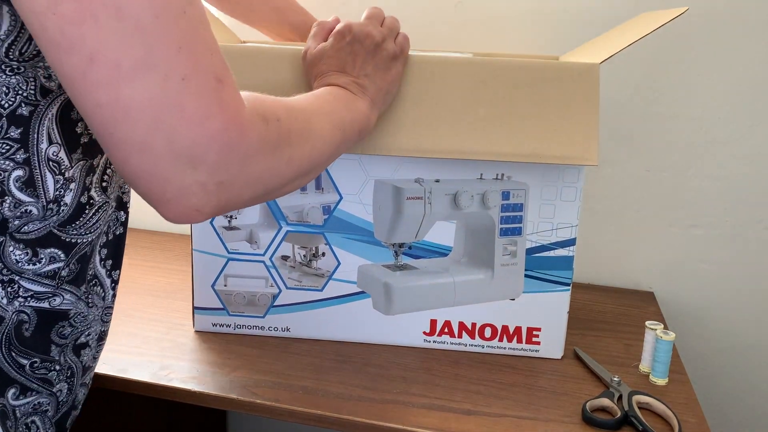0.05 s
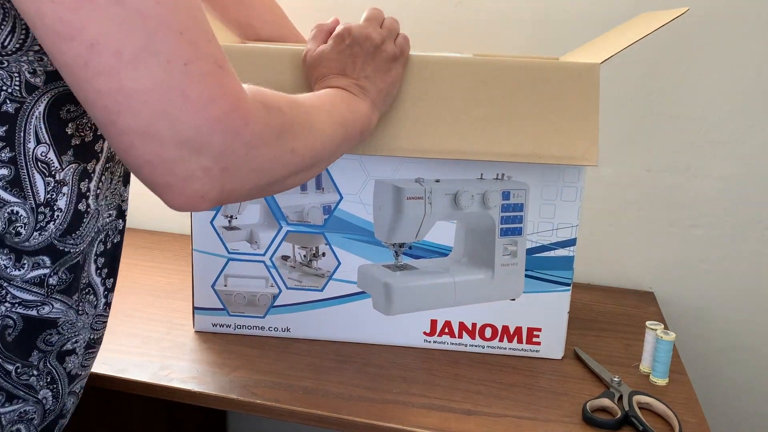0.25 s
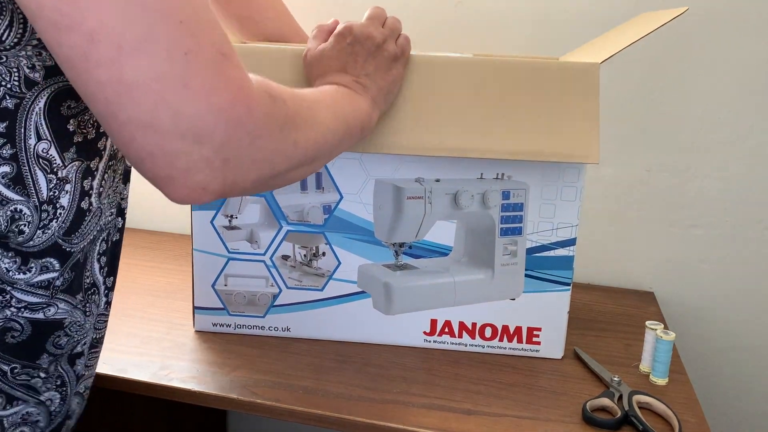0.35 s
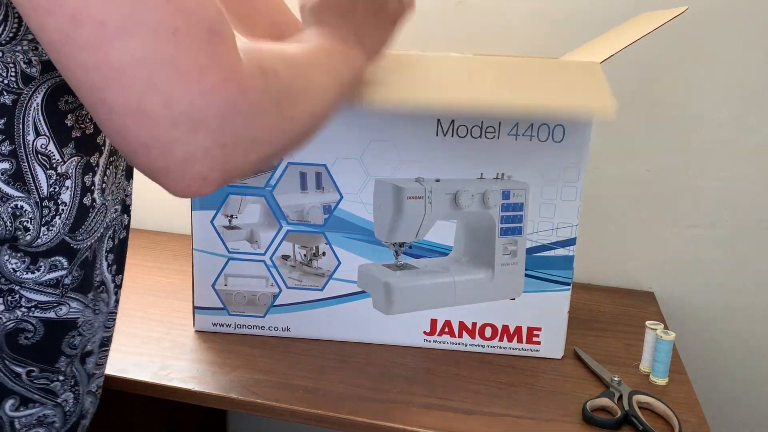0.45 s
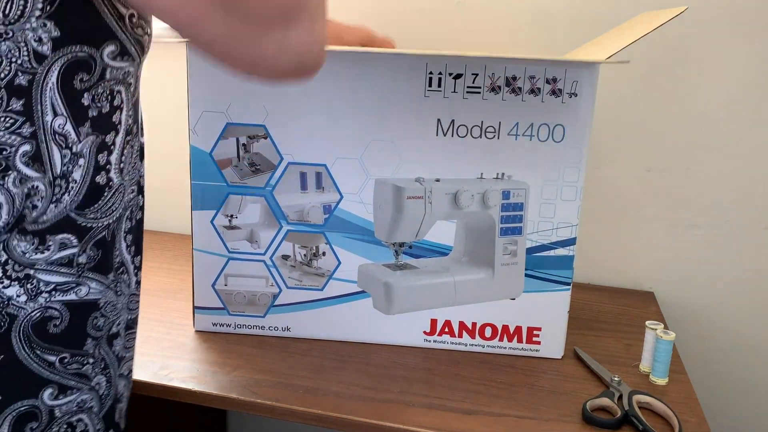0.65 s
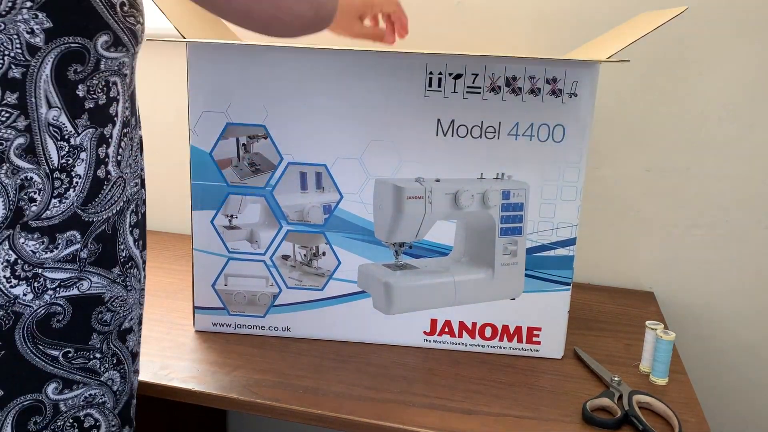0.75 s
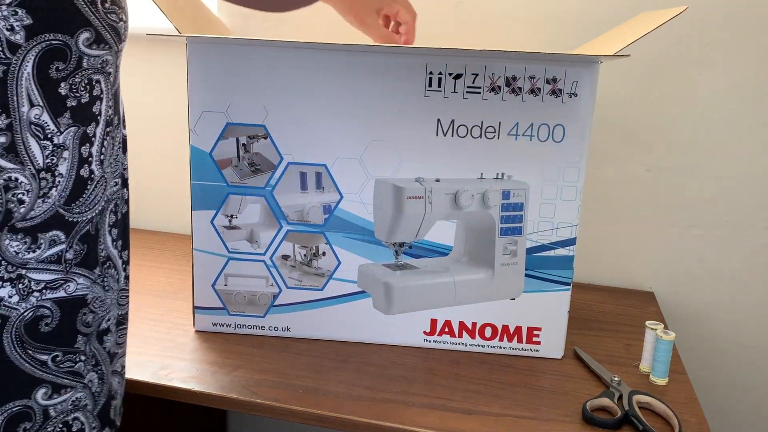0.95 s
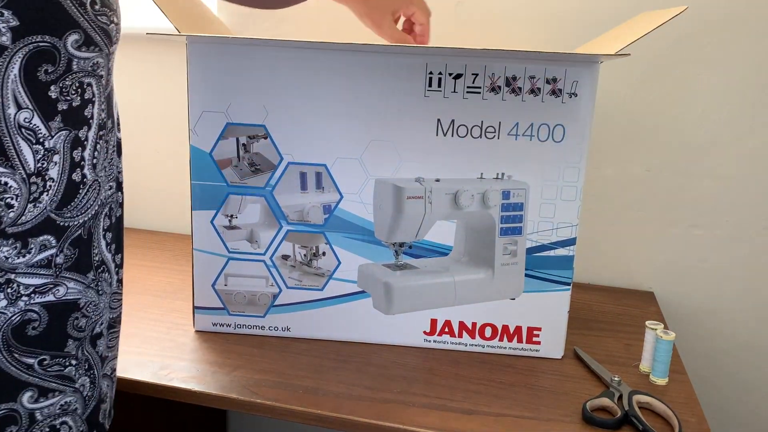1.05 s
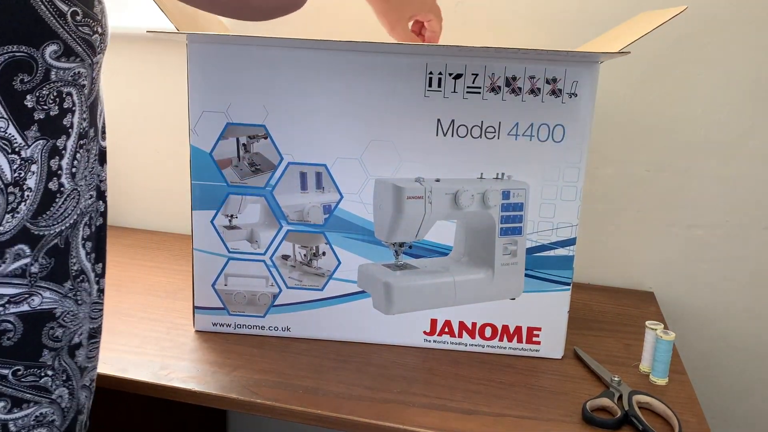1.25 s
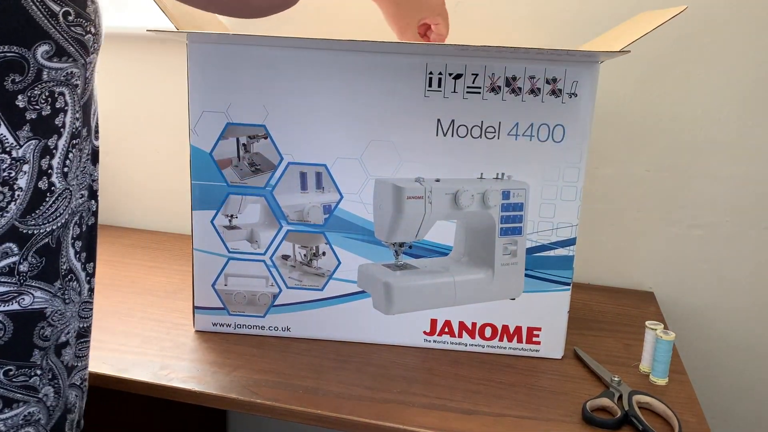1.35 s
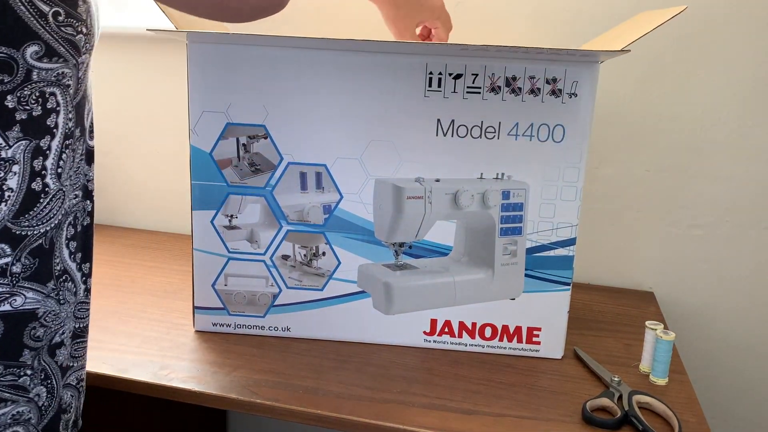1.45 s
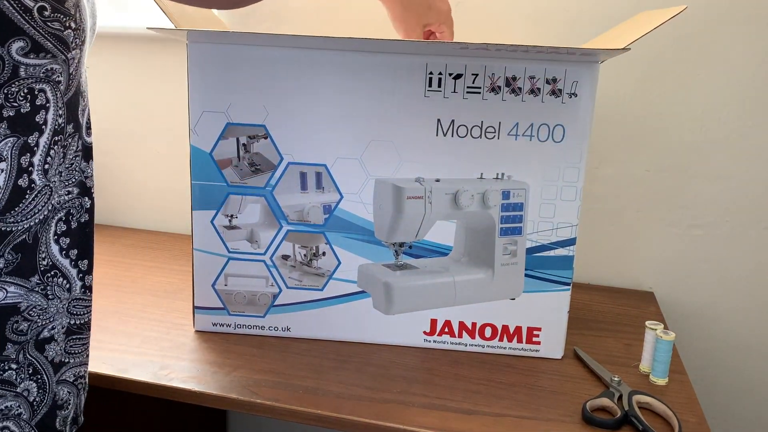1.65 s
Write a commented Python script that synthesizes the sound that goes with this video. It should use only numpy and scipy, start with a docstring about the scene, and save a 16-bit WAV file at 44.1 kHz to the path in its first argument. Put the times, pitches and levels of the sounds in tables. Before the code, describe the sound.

Cardboard box flaps are opened by hand: a light bump and drumming scrape, one sharp hollow knock, rough rubbing, a low flap wobble, then scattered ticks and faint rustles, close stereo phone microphones in a quiet room.

```python
"""A light bump and a short drumming scrape open the scene: hands pull at the flaps of a cardboard box
in a quiet room, close to a phone with two microphone ports. One sharp knock and lighter bumps ring
the modes of the hollow box; ticks are snaps of noise. Grainy noise makes card scrape over card and
drum the box. A freed flap wobbles low and a panel groans downward, both as gliding sines.
A faint squeak is resonant noise; room tone and a decaying noise echo lie behind it all."""
import sys
import numpy as np
from scipy import signal
from scipy.fft import rfft, irfft
from scipy.io import wavfile
from scipy.ndimage import uniform_filter1d

SR = 44100
rng = np.random.default_rng(int(sys.argv[2]) if len(sys.argv) > 2 else 0)


def materialize(psi):
    """Save the field psi as 16-bit PCM at rate SR to the path in sys.argv[1].

    A 1-D psi becomes a single channel; in a 2-D psi each row is a channel.
    """
    bounded = np.clip(np.atleast_2d(psi).T, -1, 1)
    quanta = np.round(bounded * 32767).astype(np.int16)
    wavfile.write(sys.argv[1], SR, quanta)


N = 74970
T = np.arange(N) / SR
F = np.arange(N // 2 + 1) * SR / N

# spectrum of the room tone: f/Hz, density level/dB
ROOM_SPECTRUM = [(40, -21), (400, -7), (900, -25), (1800, -12.5), (4000, -39.5), (9000, -22.5),
                 (16000, -23)]
ROOM_DB = -75.5
ROOM_T60_S, ECHO_GAP_S = 0.28, .003
WET_DB, SIDE_ECHO_DB = -28.5, -6

# phase of the left port against the right: f/Hz, phase/rad
PORT_PHASE = [(0, 0), (400, -.15), (2000, -1.6), (4000, -3.1), (6300, -6.3), (16500, -19.85)]
# sound unrelated between the ports, as side level: f/Hz, level/dB
PORT_SIDE = [(60, -15), (250, -21), (700, -6), (2000, -1), (5000, -4), (8000, -18), (16000, -16)]
RIGHT_DB = .7  # right port over left
LOW_CUT_HZ, TOP_HZ = 40, 15900

# squeak of a sliding edge: t/s, level/dB
SQUEAK_LEVEL = [(.62, -82), (.69, -71), (.78, -72), (.86, -80), (.9, -95)]
# resonances of the squeak: f/Hz, level/dB
SQUEAK_RESONANCES = [(1700, 0), (2350, -1), (3400, -2)]
SQUEAK_WIDTH_HZ = 170  # full width at half amplitude

# free flap wobbling: t/s, f/Hz, level/dB
FLAP_WOBBLE = [(.7, 62, -69), (.718, 73, -48), (.745, 62.4, -53.5), (.775, 65.6, -56), (.81, 69.8, -56.5),
               (.85, 72, -64.5), (.9, 68.7, -80.5)]
# panel groaning: t/s, f/Hz, level of the fundamental/dB
PANEL_GROAN = [(.934, 168.8, -63), (.942, 164, -43), (.955, 125.3, -42), (.97, 109.5, -41), (.986, 92, -41),
               (1.002, 71.5, -63)]
# groan harmonics from the second up, against the fundamental: level/dB
GROAN_HARMONICS = [-20.5, -13]

# ticks of card edges: t/s, level/dB, centre f/Hz, tail t60/s
EDGE_TICKS = [(0.1991, -27, 8050, 0.2), (0.3553, -27.5, 3700, 0.13), (0.4874, -30, 10100, 0.032),
              (0.5095, -31, 6740, 0.48), (0.9477, -31, 5500, 0.16), (1.038, -31.5, 4430, 0.31),
              (1.068, -23, 8500, 0.19), (1.1786, -27, 3640, 0.13), (1.232, -37, 3920, 0.05),
              (1.268, -30, 6800, 0.13), (1.3203, -31.5, 4600, 0.058), (1.341, -37.5, 5470, 0.27),
              (1.3815, -30, 6400, 0.23), (1.402, -38, 3980, 0.44), (1.483, -31.5, 4400, 0.14),
              (1.27, -35.5, 2130, 0.045), (1.341, -35.5, 2100, .06), (1.499, -37, 6200, 0.087),
              (1.6079, -23, 7440, 0.031), (1.686, -30.5, 5860, 0.07), (1.025, -35.5, 4700, 0.12),
              (1.251, -39, 6500, 0.04), (1.275, -34, 4800, 0.034), (1.351, -35, 5760, 0.091)]
TICK_SNAP_S, TICK_TAIL_DB = .011, -14  # t60 of the snap, level of the tail against it
TICK_WIDTH = 1.0  # bandwidth as a ratio to the centre
TICK_LEN = 8192  # samples

# modes of the hollow box: f/Hz, level/dB, t60/s
BOX_MODES = [(92.8, -20.5, 0.093), (162.8, 7, 0.069), (217, 0, 0.088), (324.8, 5, 0.067), (454, -9, 0.076),
             (571, -11, 0.12), (653.4, -7, 0.076), (760.4, -15.5, 0.2), (847, -13, 0.082), (892, -17, 0.12),
             (1002, -26, 0.04), (1253, -2.5, 0.013), (1470, -21.5, 0.1)]
PANELS_BELOW_HZ = 270  # modes under this belong to the big panels
# blows on the box: t/s, level/dB, push length/ms, big panels' share level/dB, pitch where held/ratio
BOX_BLOWS = [(.006, -39.5, 1.01, -25, 1.38), (0.172, -37, 1.16, 0, 0.85), (0.1986, -7, 1.234, -2.5, 1.01),
             (0.2044, -19, 1.58, -1, 1), (0.2174, -18, 4, 2.5, 1.2), (0.365, -28.5, 1.4, 6, 1.13),
             (0.411, -36, 0.91, -25, 1.11), (0.444, -34, 0.66, -8, 1.05), (0.511, -42, 1.4, -10, 1.04),
             (0.936, -42, 2.3, -10.5, 1.1), (1.1794, -39, 0.54, -7.5, 1.01),
             (1.232, -42.5, 0.63, -16, 1.075), (1.276, -43.5, 1.1, -7, 0.86),
             (1.3217, -39.5, 0.81, -3, 1.01), (1.639, -39, 1.54, -16, 0.96), (1.667, -40, 0.54, -5.5, 0.95)]
# spectrum of the crack in a blow: f/Hz, level/dB
CRACK_SPECTRUM = [(600, 4.5), (1400, -1), (2200, -9.5), (4000, -11.5)]
CRACK_DB, CRACK_T60_S = -20, .05  # level for a 1 ms push

# rubbing: t/s, hiss level/dB, middle level/dB, drumming box level/dB, rumble level/dB
RUB_LEVELS = [(0, -61.5, -60.5, -44, -54), (.04, -83, -61.5, -51.5, -51), (.1, -110, -77, -59.5, -54),
              (.165, -73, -81, -70, -52), (.19, -71, -56.5, -79, -42.5), (.21, -41.5, -68, -33.5, -32.5),
              (.24, -65, -59, -43.5, -32), (.285, -63, -71, -41, -38), (.325, -48.5, -49.5, -50, -47),
              (.38, -49, -48, -43.5, -50), (.425, -43.5, -50.5, -53, -49), (.465, -57.5, -47.5, -48, -92),
              (.485, -64, -60.5, -61.5, -57), (.52, -58, -59, -55.5, -56), (.575, -50, -53.5, -46, -74),
              (.64, -63, -66.5, -58.5, -69), (.69, -60, -62, -54, -59.5), (.72, -97, -69.5, -60, -59.5),
              (.8, -75.5, -78.5, -66, -65), (.83, -85.5, -82.5, -87, -82), (.92, -81.5, -81, -87, -91),
              (.945, -49, -59, -53, -45), (.99, -52.5, -72.5, -63.5, -53.5),
              (1.04, -52.5, -63.5, -62, -60.5), (1.085, -60, -67, -63.5, -59), (1.15, -74, -62, -67.5, -63),
              (1.2, -49.5, -66, -56.5, -74), (1.225, -74, -61, -68, -61), (1.26, -50.5, -61.5, -64, -70),
              (1.285, -71, -60.5, -52, -68), (1.312, -62, -59.5, -67, -56), (1.345, -48.5, -61, -56.5, -60),
              (1.375, -61.5, -66, -63.5, -82), (1.41, -65, -61.5, -59, -83), (1.46, -59, -67.5, -59, -66),
              (1.5, -72, -56, -62, -57), (1.56, -109, -68, -71, -68.5), (1.6, -72, -67, -68, -67.5),
              (1.62, -55.5, -62.5, -63, -63.5), (1.66, -50, -57, -53.5, -93), (1.7, -49, -50, -56, -65)]
# spectra of the hiss, middle range and rumble: f/Hz, level/dB
HISS_SPECTRUM = [(2500, -9), (3500, -4), (5000, -3), (6800, 0), (9000, 7), (11500, 9), (14000, 7),
                 (16000, 5.5)]
MIDDLE_SPECTRUM = [(500, 4.5), (800, 1.5), (1100, 1.5), (1500, 2.5), (2200, 2), (3000, -1.5), (4200, -3)]
RUMBLE_SPECTRUM = [(30, -6.5), (50, -5.5), (140, 2), (220, -6.5)]
# how well rubbing excites the box: f/Hz, level/dB
DRUM_SPECTRUM = [(120, -6.5), (220, 2), (330, 5), (456, 11.5), (600, -9), (1500, 3.5)]
DRUM_WIDEN, DRUM_TILT = 1.2, .5  # factors on the modes' decay rate and dB levels
GRAINS_PER_S, GRAIN_SHARE = 450, 0.23  # rate, share of power
GRAIN_SCATTER_DB, GRAIN_CAP_DB = 4, 14  # mean before the cap, cap
FLICKER_DB, FLICKERS_PER_S = 1.5, 45.55
PATCHY_DB, PATCHES_PER_S = 2.4, 30


def undb(db):
    """Turn dB into gain."""
    return 10 ** (np.asarray(db, float) / 20)


def unit(x):
    """Bring a signal to rms 1."""
    return x / np.sqrt(np.mean(x ** 2))


def noise():
    """White noise for the whole scene."""
    return rng.standard_normal(N)


def over_hz(table):
    """Read a spectrum table at every frequency, on a log axis."""
    hz, value = np.array(table, float).T
    return np.interp(np.log(F + 1), np.log(hz), value)


def colour(x, table):
    """Shape a signal by a spectrum table, falling away outside it."""
    low_edge = np.minimum(1, (F / table[0][0]) ** 2)
    high_edge = np.minimum(1, (table[-1][0] / (F + 1)) ** 2)
    return irfft(rfft(x) * undb(over_hz(table)) * low_edge * high_edge, N)


def curve(table, col):
    """Draw one column of a time table as a sample-by-sample curve."""
    points = np.array(table, float)
    return np.interp(T, points[:, 0], points[:, col])


def walk(rate):
    """Random levels held for 1 / rate s, then slewed; rms 1."""
    hold = int(SR / rate)
    steps = np.repeat(rng.standard_normal(N // hold + 1), hold)
    return unit(uniform_filter1d(uniform_filter1d(steps, hold), hold)[:N])


def room_tone():
    """Steady coloured noise of the quiet room."""
    return undb(ROOM_DB) * unit(colour(noise(), ROOM_SPECTRUM))


def echo(x):
    """Room tail: exponentially fading noise after a short gap, drawn afresh each time."""
    t = T[:SR // 2]
    tail = rng.standard_normal(len(t)) * 1000. ** (-t / ROOM_T60_S) * (t > ECHO_GAP_S)
    return signal.fftconvolve(x, tail / np.linalg.norm(tail))[:N]


def squeak():
    """A sliding edge squeaks faintly: noise through narrow resonances."""
    shape = sum(undb(db) / (1 + ((F - hz) * 2 / SQUEAK_WIDTH_HZ) ** 2)
                for hz, db in SQUEAK_RESONANCES)
    return unit(irfft(rfft(noise()) * shape, N)) * undb(curve(SQUEAK_LEVEL, 1))


def rumble():
    """Low noise that follows the rubbing."""
    return unit(colour(noise(), RUMBLE_SPECTRUM)) * undb(curve(RUB_LEVELS, 4))


def panel_swing(table, harmonics_db=()):
    """A swinging panel sounds a low sine, with any harmonics, gliding in pitch and level."""
    phase = 2 * np.pi * np.cumsum(curve(table, 1)) / SR
    tone = np.sin(phase) + sum(undb(db) * np.sin((k + 2) * phase)
                               for k, db in enumerate(harmonics_db))
    sounding = (T > table[0][0]) & (T < table[-1][0])
    gate = uniform_filter1d(sounding * 1., size=400)
    return np.sqrt(2) * tone * undb(curve(table, 2)) * gate


def ticks():
    """Card edges tick: a snap of band noise over a softer, longer tail."""
    out, t = np.zeros(N), T[:TICK_LEN]
    f = np.fft.rfftfreq(TICK_LEN, 1 / SR)
    attack = 1 - np.exp(-t / 0.0012)
    snap = 1000. ** (-t / TICK_SNAP_S)
    for s, db, hz, t60 in EDGE_TICKS:
        detune = (f / hz - hz / (f + 1)) * 2 / TICK_WIDTH
        band = unit(irfft(rfft(rng.standard_normal(TICK_LEN)) / np.sqrt(1 + detune ** 2)))
        tail = undb(TICK_TAIL_DB) * 1000. ** (-t / t60)
        i = int(s * SR)
        out[i:i + TICK_LEN] += (band * attack * (snap + tail) * undb(db) / 2)[:N - i]
    return out


def box_ring(widen=1, tilt=1, panels_db=0, pitch=1):
    """Tap response of the box: decaying modes, neighbours swinging in opposite sense."""
    t = T[:SR // 3]
    out = np.zeros(len(t))
    for k, (hz, db, t60) in enumerate(BOX_MODES):
        gain = undb(tilt * db + panels_db * (hz < PANELS_BELOW_HZ))
        decay = 1000. ** (-t * widen / t60)
        out -= (-1) ** k * gain * np.sin(2 * np.pi * pitch * hz * t) * decay
    return out


def blows():
    """A smooth push rings the box and adds a crack; a longer push sounds duller."""
    out, crack = np.zeros(N), unit(colour(noise(), CRACK_SPECTRUM))
    for s, db, ms, panels_db, pitch in BOX_BLOWS:
        i = int(s * SR)
        push = np.hanning(max(int(ms * SR / 1000), 4))
        hit = np.convolve(box_ring(panels_db=panels_db, pitch=pitch), push)[:N - i]
        end = i + len(hit)
        crack_fade = 1000. ** (-T[:len(hit)] / CRACK_T60_S)
        snap = crack[i:end] * crack_fade * undb(CRACK_DB) / ms ** 2
        out[i:end] += (hit / np.abs(hit).max() + snap) * undb(db)
    return out


def grit():
    """Sliding noise with grains: card fibres catch at random and let go."""
    scatter_db = np.minimum(GRAIN_SCATTER_DB * rng.exponential(size=N), GRAIN_CAP_DB)
    catch = (rng.random(N) < GRAINS_PER_S / SR) * undb(scatter_db)
    release = np.exp(-T[:300] / 0.0011)
    grains = signal.fftconvolve(catch, release)[:N] * noise()
    return np.sqrt(GRAIN_SHARE) * unit(grains) + np.sqrt(1 - GRAIN_SHARE) * noise()


def patchy(x):
    """Overlapping half-octave bands from about 350 Hz up swell and thin on their own."""
    spec, place = rfft(x), 2 * np.log2((F + 1) / 350)
    out = np.zeros(N)
    for k in range(13):
        band = irfft(spec * np.clip(1 - abs(place - k), 0, 1), N)
        out += band * undb(PATCHY_DB * walk(PATCHES_PER_S))
    return out


def rubbing(pull):
    """Card on card: hiss, middle and drumming box share an uneven pull; rumble and squeak do not."""
    scrape = patchy(grit())
    hiss = unit(colour(scrape, HISS_SPECTRUM)) * undb(curve(RUB_LEVELS, 1))
    middle = unit(colour(scrape, MIDDLE_SPECTRUM)) * undb(curve(RUB_LEVELS, 2))
    boxed = signal.fftconvolve(grit(), box_ring(DRUM_WIDEN, DRUM_TILT))[:N]
    drum = unit(colour(boxed, DRUM_SPECTRUM)) * undb(curve(RUB_LEVELS, 3))
    return (hiss + middle + drum) * pull + rumble() + squeak()


def scene():
    """Box, echo and room tone reach two ports that differ in phase and partly hear other spots of card."""
    pull = undb(FLICKER_DB * walk(FLICKERS_PER_S))
    hits = blows() + panel_swing(FLAP_WOBBLE) + panel_swing(PANEL_GROAN, GROAN_HARMONICS)
    close = rubbing(pull) + ticks() + hits
    mid = rfft(close + undb(WET_DB) * echo(close) + room_tone())
    # the side has its own noise, and only the echo of the hits
    apart = rubbing(pull) + ticks() + undb(SIDE_ECHO_DB) * echo(hits) + room_tone()
    side = rfft(apart) * undb(over_hz(PORT_SIDE))
    # each port takes half the phase difference
    turn = np.exp(.5j * np.interp(F, *np.array(PORT_PHASE).T))
    left = irfft((mid + side) * turn, N) * undb(-RIGHT_DB / 2)
    right = irfft((mid - side) / turn, N) * undb(RIGHT_DB / 2)
    return np.array([left, right])


def record(dry):
    """The phone cuts the deepest bass gently and the top steeply."""
    low_cut = signal.butter(2, LOW_CUT_HZ, "high", fs=SR, output="sos")
    top_cut = signal.ellip(10, .2, 75, TOP_HZ, fs=SR, output="sos")
    return signal.sosfilt(top_cut, signal.sosfilt(low_cut, dry))


dry = scene()
out = record(dry)
materialize(out)
```